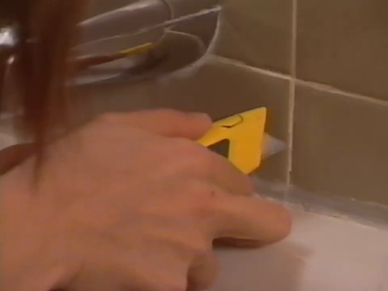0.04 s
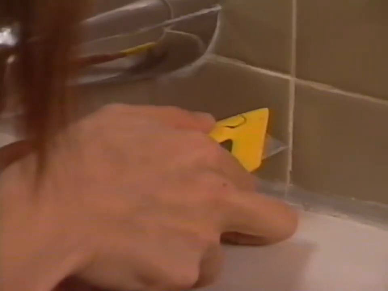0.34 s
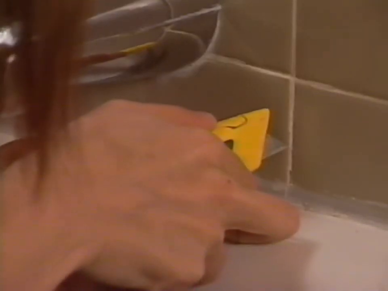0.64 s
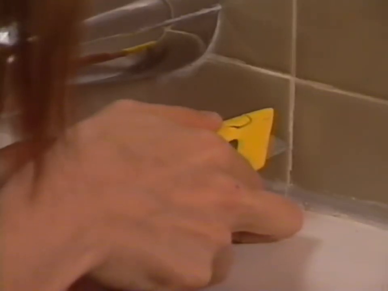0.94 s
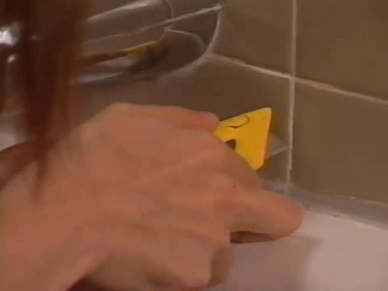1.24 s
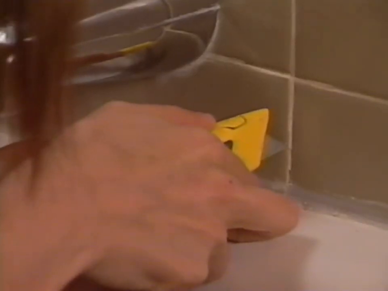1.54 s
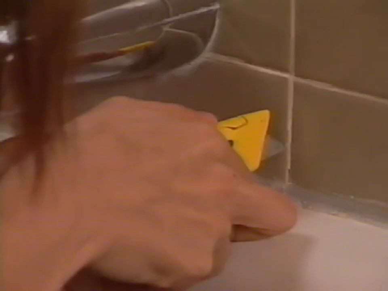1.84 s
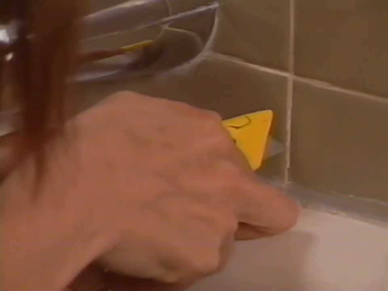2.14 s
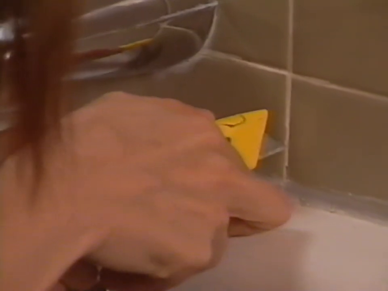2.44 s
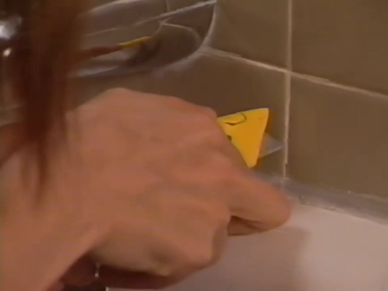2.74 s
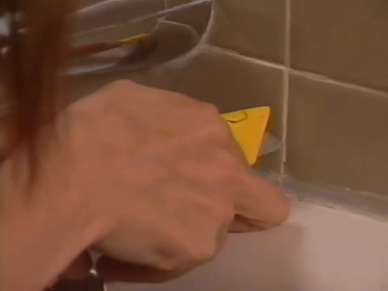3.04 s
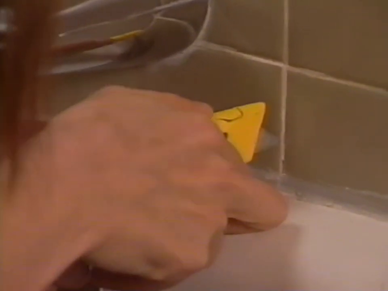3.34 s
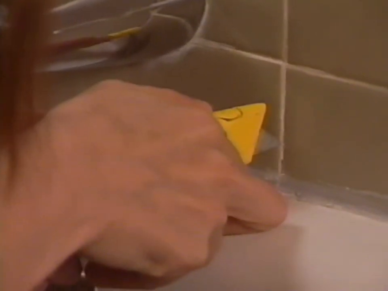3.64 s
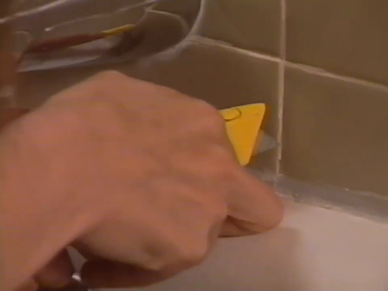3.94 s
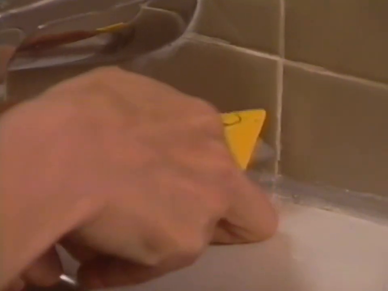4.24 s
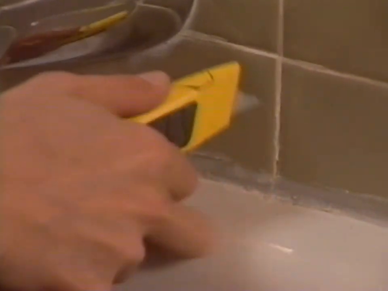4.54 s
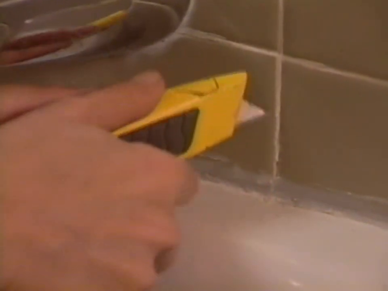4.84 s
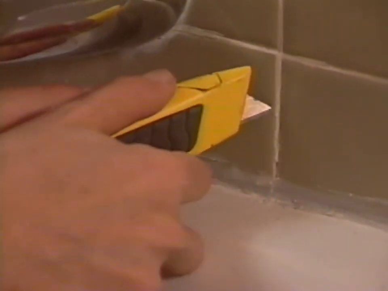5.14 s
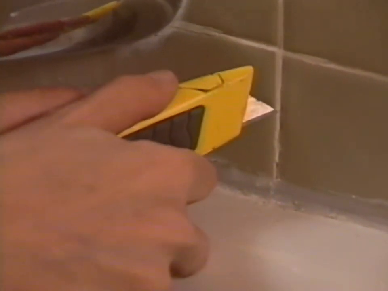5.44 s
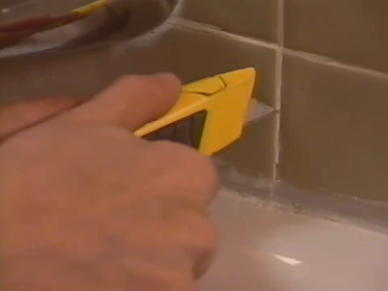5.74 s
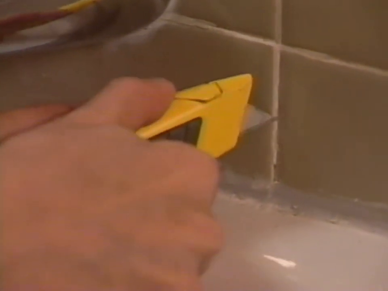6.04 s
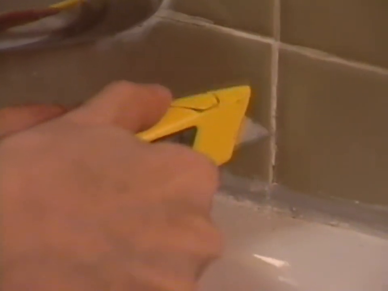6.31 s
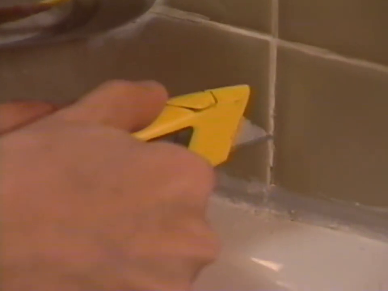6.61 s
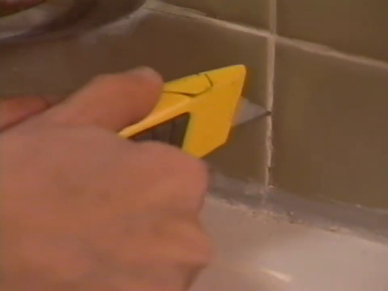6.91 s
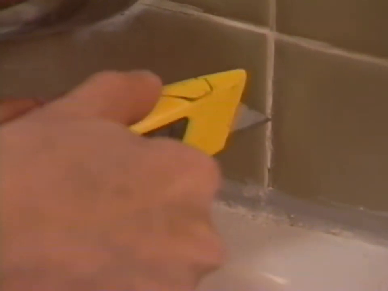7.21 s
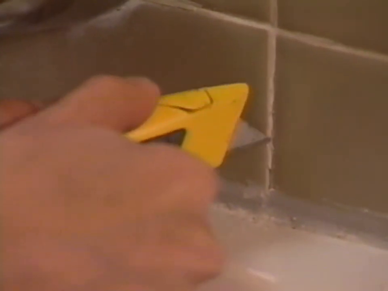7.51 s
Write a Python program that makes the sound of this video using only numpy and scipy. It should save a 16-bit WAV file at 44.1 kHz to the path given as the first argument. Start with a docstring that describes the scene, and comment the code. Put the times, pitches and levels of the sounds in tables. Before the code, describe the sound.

Close, quiet picking of a blade in a grout joint, broken by four sudden hard chips, over light hiss and hum.

```python
"""Knife scraping tile grout

A utility knife is pressed into old grout between wall tiles above a bathtub, close to the microphone.
Stick-slip friction makes it chatter on the wall, grit fractures on the blade and the hand thumps the tub.
The handle creaks as the grip changes and the small tiled room reverberates.
The recorder's electronics add hum, whine, hiss and static ticks."""
import sys
import numpy as np
from scipy import signal
from scipy.fft import rfft, irfft
from scipy.io import wavfile
from scipy.ndimage import uniform_filter1d, minimum_filter1d

SR = 44100
rng = np.random.default_rng(int(sys.argv[2]) if len(sys.argv) > 2 else 0)


def file_out(sig):
    """Save sig as 16-bit WAV at sys.argv[1]."""
    # one column per channel
    cols = np.atleast_2d(sig).T
    # limit, then scale
    lim = np.clip(cols, -1, 1)
    pcm = np.round(lim * 32767).astype(np.int16)
    wavfile.write(sys.argv[1], SR, pcm)


N = 342657

# response of the wall to the tip: (frequency [Hz], gain [dB])
WALL_SPECTRUM = [(60, -35), (150, -10.5), (330, -16), (480, -8), (620, 1), (900, -2.5), (1250, 0),
                 (1750, -6.5), (2300, -11.5), (3000, -19.5), (4500, -22.5), (16000, -78)]
# response of the steel blade to cracking grit: (frequency [Hz], gain [dB])
BLADE_SPECTRUM = [(200, -40), (1500, -2.5), (2600, 0), (3400, 5), (4200, 2), (5600, 5), (7000, -0.5),
                  (8300, 2), (10500, -8.5), (12500, -16), (16000, -51)]
# response of the tub to the hand: (frequency [Hz], gain [dB])
TUB_SPECTRUM = [(30, -41), (72, 2), (110, -5), (145, 0.5), (190, -7.5), (300, -9), (600, -13), (2000, -93),
                (16000, -97)]
# steady background hiss: (frequency [Hz], relative spectral density [dB])
HISS_SPECTRUM = [(20, 4.5), (45, 5.5), (90, 5), (150, 3), (250, 4.5), (500, -1.5), (1000, -3.5), (2000, -8),
                 (3500, -9.5), (8000, -7), (11000, -8), (14000, -12.5), (16500, -20)]


def slips():
    """Stick-slip friction: each release of the tip drives the wall, crushes grit and loads the tub."""
    # main slips: (time [s], duration [s], chatter rate [Hz], relative chatter and grit levels [dB])
    main_slips = [(.004, 0.029, 753, -63, -75), (0.419, 0.01, 1400, -58, -78),
                  (.819, 0.0069, 1000, -53.5, -81), (0.9974, 0.0057, 1100, -27.5, -39),
                  (1.009, 0.0043, 950, -36.5, -65), (1.762, 0.0078, 1120, -58, -62),
                  (1.809, 0.0036, 1190, -53, -69), (2.098, 0.017, 1190, -46.5, -62),
                  (2.234, 0.013, 1386, -47.5, -60.5), (2.383, 0.013, 715, -58, -71),
                  (2.498, 0.015, 1280, -60, -66), (2.754, 0.01, 793, -61, -78),
                  (2.995, 0.017, 930, -60.5, -65.5), (3.035, 0.0048, 1080, -46, -63),
                  (3.056, 0.019, 780, -42.5, -52), (3.317, 0.012, 680, -61, -79),
                  (3.556, .0092, 1126, -58.5, -68), (3.899, 0.037, 1060, -61, -73),
                  (4.06, 0.049, 754, -59.5, -68.5), (4.17, 0.0031, 1090, -54, -53),
                  (4.194, 0.019, 1026, -54.5, -61), (4.298, .009, 1230, -55, -68),
                  (4.317, 0.013, 1326, -59, -68), (5.596, 0.0094, 1020, -58.5, -83),
                  (5.667, 0.0076, 1200, -55, -69), (5.691, 0.013, 843, -58.5, -67),
                  (5.837, 0.012, 965, -62.5, -84), (6.1149, .0046, 834, -21, -29.5),
                  (6.324, 0.011, 783, -52.5, -55), (6.342, .022, 662, -49.5, -59.5),
                  (6.39, 0.0081, 942, -19.5, -36.5), (6.694, 0.013, 876, -56, -61.5),
                  (6.73, 0.015, 1203, -51, -57), (6.782, 0.02, 1286, -52.5, -57),
                  (6.808, 0.011, 1326, -45.5, -55.5), (6.881, 0.0053, 1220, -51, -60.5),
                  (6.98, 0.0092, 1285, -52, -67), (7.158, 0.062, 888, -61, -70.5),
                  (7.257, .011, 770, -58, -58), (7.271, 0.011, 710, -50, -57),
                  (7.3325, .012, 1035, -21, -37), (7.591, 0.0079, 1260, -54, -68),
                  (7.747, 0.03, 1045, -49.5, -68)]
    # modes of the steel blade: (frequency [Hz], level [dB], T60 [s])
    blade_modes = [(2334, 2, 0.024), (3353, -0.5, 0.053), (4640, -6.5, 0.077), (5500, 4.5, 0.0092),
                   (5880, 1, 0.025), (7440, -17, 0.014), (9800, 4, 0.011)]
    hard_slip_db = -30
    out, t = np.zeros(N), np.arange(4096) / SR
    wall, blade, tub = response(WALL_SPECTRUM), response(BLADE_SPECTRUM), response(TUB_SPECTRUM)
    steel = unit(blade) + 0.26 * unit(ring(blade_modes)[:len(blade)])
    for s, length, hz, chatter_db, grit_db in [*main_slips, *microslips()]:
        length = max(length, .002)
        speed = (1 - np.exp(-(t + 0.00038) / 0.00064)) * np.exp(-(t / length) ** 4)
        swing = through(chatter(t, hz, jitter=0.2) * speed, wall)
        crumbs = through(grains(len(t), per_s=6000, spread_db=1.5) * speed, wall)
        # a hard, sustained slip settles into oscillation; a brief or light one mostly crumbles
        crumb_gain = np.clip(0.0067 / length, .5, 1.2) * np.interp(chatter_db, [-42, -22], [2.2, .7])
        knock = unit(swing) + crumb_gain * unit(crumbs)
        # grit goes on cracking for a moment after the tip stops
        afterbreak = 0.13 * np.exp(-t / (2.1 * length))
        grit = grains(len(t), per_s=12000, spread_db=1.5) * (speed + afterbreak)
        add(out, s, burst(knock, chatter_db + 1.63, length))
        add(out, s, burst(through(grit, steel), grit_db + 1.5, length))
        add(out, s, tub_thump(t, tub, s, length, chatter_db))
        if chatter_db > hard_slip_db:  # the grout starts to crack just before it yields
            lead = 0.66 * length
            cracks = grains(len(t), per_s=9000, spread_db=1.5) * np.exp(-(t / lead) ** 4)
            fracture = unit(through(cracks, steel)) + 1.3 * unit(through(cracks, wall))
            add(out, s - lead, burst(fracture, grit_db - 3, lead))
    return out


def chatter(t, hz, jitter, count=128):
    """Relaxation oscillation: stick-slip pulses of uneven period, smoothed by the knife's inertia."""
    period_scatter, force_scatter = np.clip(rng.standard_normal((2, count)), -2, 2)
    periods = np.exp(jitter * period_scatter) / hz
    onsets = ((np.cumsum(periods) - periods[0]) * SR).astype(int)
    pulses = np.bincount(onsets, undb(2 * force_scatter), len(t))[:len(t)]
    return bandpass(pulses, 0.34 * hz, 1.71 * hz, order=2)


def microslips(count=80):
    """Small random stick-slip events, stronger as the tip grinds harder; rows as for the main slips."""
    median_gap_s, median_length_s, median_hz = 0.11, 0.0096, 1057
    gap, length, pitch, strength = np.clip(rng.standard_normal((count, 4)), -2, 2).T
    times = np.cumsum(median_gap_s * np.exp(.5 * gap))
    lengths = median_length_s * np.exp(0.22 * length)
    rates = median_hz * np.exp(.18 * pitch)
    chatter_db = grinding_db(times) + 2.5 + 5 * strength
    grit_db = chatter_db - 9
    return np.column_stack([times, lengths, rates, chatter_db, grit_db])


def tub_thump(t, tub, s, length, chatter_db):
    """Transient loading: a harder, longer slip makes the hand thump the tub louder and deeper."""
    typical_db, typical_s = -45, .01
    regrip_s, lifted_db = 4.1, -5.5  # a finger leaves the rim, weakening the coupling to the tub
    growth_db = 0.9121 * (chatter_db - typical_db) + 6 * np.log2(length / typical_s)
    push_db = -55 + growth_db + lifted_db * (s > regrip_s)
    load = t ** 2 * np.exp(-t / 0.0061)
    hz = np.interp(push_db, [-44, -37], [152, 116])
    flex = unit(load * np.sin(2 * np.pi * hz * t))
    rumble = unit(through(load * rng.standard_normal(len(t)), tub))
    return burst(0.72 * flex + rumble, push_db + 0.5, length=0.051)


def grinding():
    """Abrasion: fine grains break under the tip, exciting wall and blade; the hand rubs the tub's rim."""
    pressure = undb(grinding_db(np.arange(N) / SR))
    crumbs = grains(N, per_s=380, spread_db=3.0)
    rub = shaped_noise(TUB_SPECTRUM)
    wall = unit(through(crumbs, response(WALL_SPECTRUM)))
    blade = unit(through(crumbs, response(BLADE_SPECTRUM)))
    return pressure * (wall + undb(-5.5) * blade + undb(1.5) * rub)


def grinding_db(s):
    """Friction noise follows the load on the tip: its level at time s."""
    # how hard the tip grinds in the joint: (time [s], level [dB])
    effort = [(0, -65.5), (.2, -85), (.8, -82.5), (1.35, -74.5), (1.9, -79), (2.35, -73.5), (2.85, -82),
              (3.2, -77.5), (3.65, -68.5), (3.8, -79), (4.12, -66.5), (4.5, -80), (5.4, -76.5), (5.75, -73),
              (6.05, -89), (6.6, -66.5), (6.95, -66), (7.77, -69.5)]
    return np.interp(s, *np.transpose(effort))


def handle_creaks():
    """Impulsive excitation: the blade shifts in its handle, and each click snaps and rings the plastic."""
    # creaks as the grip changes: (time [s], relative level [dB], pitch factor [ratio])
    creaks = [(.419, -64, 1.01), (2.637, -67, 0.98), (4.609, -62.5, 1.08), (4.693, -63, 1.02),
              (4.7192, -58, 1), (4.843, -70, 1.07), (4.947, -58.5, 0.98), (5.158, -67.5, 1.05)]
    # modes of the plastic handle: (frequency [Hz], level [dB], T60 [s])
    handle_modes = [(1490, -11, 0.017), (2400, 5.5, 0.0098), (2670, -5.5, 0.0067), (5920, -5.5, .01),
                    (7260, -9.5, 0.01), (9400, -3.5, 0.0048)]
    out, t = np.zeros(N), np.arange(2048) / SR
    snap = bandpass(signal.unit_impulse(128), 1200, 6500)
    for s, db, stretch in creaks:
        clicks = grains(len(t), per_s=3500, spread_db=1.0) * np.exp(-t / 0.0057)
        creak = through(clicks, ring(handle_modes, stretch)) + undb(-0.5) * through(clicks, snap)
        add(out, s, burst(creak, db, length=0.017))
    return out


def bathroom(x):
    """Reverberation: the direct sound is followed by discrete modes and a diffuse tail from the tiles."""
    # modes of the wall, the tub and the air between them: (frequency [Hz], level [dB], T60 [s])
    room_modes = [(75.7, -5, 0.52), (101, -5, 0.3), (148, -3.5, 0.66), (181, 0, 0.71), (282, -15, 0.73),
                  (332.3, -11, 1), (500, -8, 0.5), (548, 5.5, 0.34), (583, -2, 0.36), (620.6, 15.5, 0.23),
                  (747, -9.5, 0.62), (785, 3.5, 0.33), (873, 3.5, 0.33), (950, 5, 0.25), (1063, -23, 0.13),
                  (1200, 7, 0.32), (1213, -12, 0.16), (1311, 11, 0.21), (1511, -18, 0.22), (1564, 6, 0.23),
                  (1850, -4.5, 0.4), (1930, -11, 0.19)]
    # diffuse field: (band centre [Hz], level [dB], T60 [s])
    tail_bands = [(100, -7.5, 0.62), (310, 3, 0.48), (696, -8, 0.35), (1350, -6, 0.34), (2740, -1.5, 0.28),
                  (5950, -7, 0.24), (12000, -11, 0.16)]
    t, hz = np.arange(SR // 2) / SR, np.fft.rfftfreq(SR // 2, 1 / SR)
    noise_spectrum = rfft(rng.standard_normal(len(t)))
    log_centres = np.log(np.array(tail_bands)[:, 0])
    arrival = np.clip((t - .003) / 0.0045, 0, 1)
    impulse = undb(-17.5) * arrival * ring(room_modes)
    for share, (_, db, t60) in zip(np.eye(len(tail_bands)), tail_bands):
        band = irfft(noise_spectrum * np.interp(np.log(hz + 1), log_centres, share), len(t))
        fade = arrival * np.exp(-np.log(1000) * t / t60)
        impulse += undb(db) * band * fade / np.linalg.norm(fade)
    return x + through(x, impulse)


def electronics():
    """Electrical noise bypasses the room: hiss, mains hum, a harmonic whine and dry static ticks."""
    # mains hum and a faint steady tone: (frequency [Hz], rms level [dB])
    hum = [(59.94, -64), (119.9, -72), (179.8, -79), (497, -76)]
    # the recorder's whine: (harmonic number, rms level [dB])
    whine = [(6, -86), (7, -83), (8, -81), (9, -82), (10, -80), (11, -79), (12, -78), (13, -82), (14, -82),
             (15, -78), (16, -83), (17, -83), (18, -84), (19, -82), (20, -93), (21, -85)]
    # static in the microphone line: (time [s], relative peak level [dB])
    static = [(0.3587, -25), (.6628, -28), (1.0761, -32), (1.5433, -26), (1.7223, -28.5), (2.493, -36),
              (2.7467, -28.5), (3.353, -29), (3.5413, -24.5), (4.1353, -35.5), (5.6811, -28),
              (6.2814, -35.5)]
    whine_hz, hiss_db = 719.25, -65
    t, ticks = np.arange(N) / SR, np.zeros(N)
    lines = list(hum) + [(harmonic * whine_hz, db) for harmonic, db in whine]
    tones = sum(np.sqrt(2) * undb(db) * np.sin(2 * np.pi * (hz * t + rng.random())) for hz, db in lines)
    spike = bandpass(signal.unit_impulse(64), 4000, 12000)
    for s, db in static:
        add(ticks, s, -undb(db + 1.5) * spike / spike.max())
    return undb(hiss_db) * shaped_noise(HISS_SPECTRUM) + tones + ticks


def crosstalk(x):
    """Stray coupling: one channel passes a faint inverted copy to the other."""
    # coupling between the channels: (frequency [Hz], gain [dB])
    coupling = [(60, -32), (1000, -34.5), (2400, -31.5), (4400, -30.5), (8000, -24.5), (15000, -27)]
    return -through(x, response(coupling))


def grains(size, per_s, spread_db):
    """Poisson process: sparse clicks of random sign and uneven strength."""
    chance, strength, push = rng.random(size), rng.exponential(size=size), rng.standard_normal(size)
    return (chance < per_s / SR) * np.sign(push) * undb(spread_db * np.minimum(strength, 4))


def ring(modes, stretch=1):
    """Modal superposition: an impulse response of damped sinusoids, with unit energy."""
    t = np.arange(SR // 2) / SR
    y = sum(undb(db - 60 * t / t60) * np.sin(2 * np.pi * hz * stretch * t) for hz, db, t60 in modes)
    return y / np.linalg.norm(y)


def response(spectrum, size=2048):
    """Minimum-phase impulse response of a (frequency [Hz], gain [dB]) spectrum."""
    hz, db = np.transpose(spectrum)
    bin_hz = np.maximum(np.fft.rfftfreq(size, 1 / SR), 1)
    magnitude = undb(np.interp(np.log(bin_hz), np.log(hz), db))
    cepstrum = irfft(np.log(magnitude))
    cepstrum[1:size // 2] *= 2
    cepstrum[size // 2 + 1:] = 0
    return irfft(np.exp(rfft(cepstrum)))


def shaped_noise(spectrum):
    """White noise filtered to a spectrum, at unit rms."""
    return unit(through(rng.standard_normal(N), response(spectrum)))


def bandpass(x, low_hz, high_hz, order=1):
    """Maximally flat band-pass filter."""
    return signal.sosfilt(signal.butter(order, [low_hz, high_hz], "band", fs=SR, output="sos"), x)


def through(x, impulse):
    """Convolution, cut to the input's length."""
    return signal.fftconvolve(x, impulse)[:len(x)]


def burst(x, db, length):
    """Energy scaling: give a sound the energy of `length` seconds at level db."""
    return x * undb(db) * np.sqrt(length * SR / (np.sum(x ** 2) + 1e-30))


def add(track, s, sound):
    """Superpose a sound on the track at time s."""
    start = int(np.clip(s * SR, 0, N))
    track[start:start + len(sound)] += sound[:N - start]


def undb(db):
    """Decibels to amplitude ratio."""
    return 10 ** (np.asarray(db) / 20)


def unit(x):
    """Scale to unit rms."""
    return x / np.sqrt(np.mean(x ** 2) + 1e-30)


def scene():
    """Sources superpose at one microphone on the left; the right has crosstalk and its own faint hiss."""
    handle = handle_creaks()
    # the handle is nearest the microphone, so its direct-to-reverberant ratio is higher
    left = bathroom(slips() + grinding() + 0.73 * handle) + 0.76 * handle + electronics()
    right = undb(-95.0) * shaped_noise(HISS_SPECTRUM) + crosstalk(left)
    return np.array([left, right])


def record(dry):
    """Peak limiting holds the hardest slips at one height; a steep low-pass limits the bandwidth."""
    ceiling, cutoff_hz = .195, 16400
    allowed = np.minimum(1, ceiling / (np.abs(dry[0]) + 1e-9))
    gain = uniform_filter1d(minimum_filter1d(allowed, size=45), size=45)
    return signal.sosfilt(signal.ellip(8, .2, 70, cutoff_hz, fs=SR, output="sos"), dry * gain)


dry = scene()
out = record(dry)
file_out(out)
```